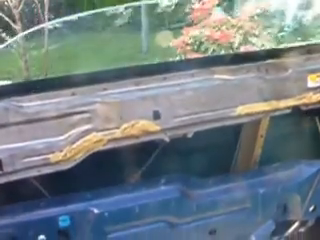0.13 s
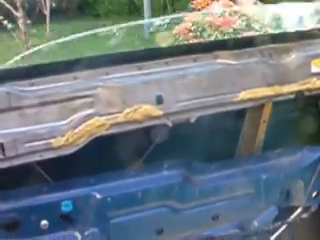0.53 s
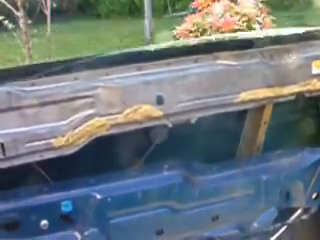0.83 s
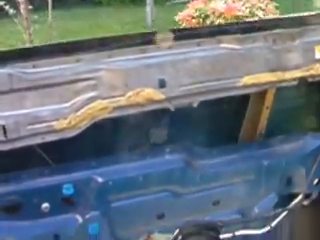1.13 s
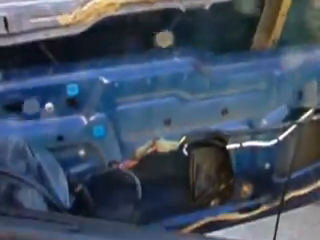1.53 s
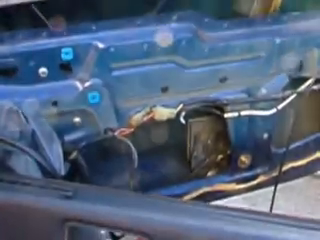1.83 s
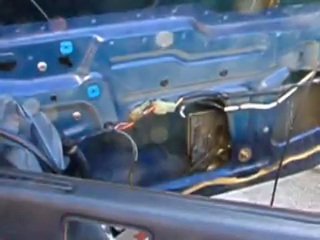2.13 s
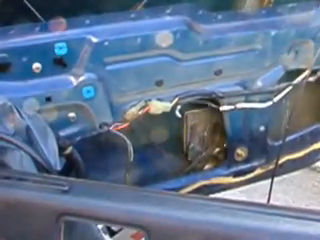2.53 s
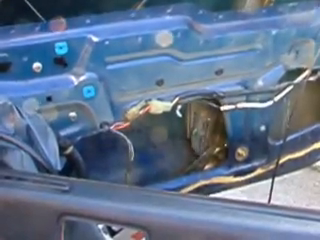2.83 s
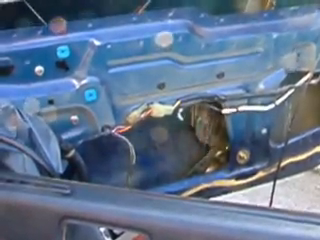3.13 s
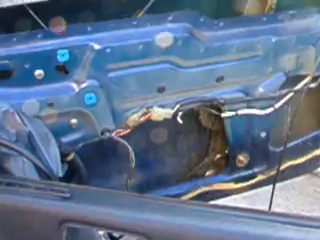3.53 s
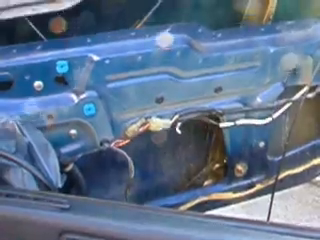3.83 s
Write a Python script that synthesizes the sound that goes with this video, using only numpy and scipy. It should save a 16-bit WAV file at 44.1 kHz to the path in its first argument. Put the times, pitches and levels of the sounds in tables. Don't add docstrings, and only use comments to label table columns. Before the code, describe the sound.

A small electric window motor whirs, stops with steel clunks, then clacks and whirs again lower.

```python
import sys
import numpy as np
from scipy import signal
from scipy.io import wavfile

SR = 44100
rng = np.random.default_rng(int(sys.argv[2]) if len(sys.argv) > 2 else 0)


def unload_wav(signal):
    wavfile.write(
        sys.argv[1],
        SR,
        np.round(np.clip(np.atleast_2d(signal).T, -1, 1) * 32767).astype(np.int16),
    )


def linear_from_db(decibels):
    return 10 ** (np.asarray(decibels, float) / 20)


N = 176400
T_S = np.arange(N) / SR
CONTACT_RISE_S = 0.003


def rms_one(x):
    return x / np.sqrt(np.mean(x ** 2) + 1e-20)


def peak_one(x):
    return x / np.abs(x).max()


def low_pass(x, order, hz):
    return signal.sosfilt(signal.butter(order, hz, fs=SR, output="sos"), x)


def band_pass(x, low_hz, high_hz):
    return signal.sosfilt(signal.butter(2, [low_hz, high_hz], "band", fs=SR, output="sos"), x)


def add(out, start_s, x):
    i = int(start_s * SR)
    out[i:i + len(x)] += x[:N - i]


def tracks(table):
    time_s, *columns = np.transpose(table)
    return [np.interp(T_S, time_s, column) for column in columns]


def drift(rate_hz):
    r = np.exp(-80 * np.pi * rate_hz / SR)
    white = rng.standard_normal(N // 40 + 2002)
    slow = signal.lfilter([1], [1, -2 * r, r * r], white)[2000:]
    return np.interp(np.arange(N) / 40, np.arange(len(slow)), rms_one(slow))


def banded(spectrum, patchy_db):
    spectrum_hz, spectrum_db = np.transpose(spectrum)
    edges_hz = 22 * 2 ** np.arange(0, 9.1, .5)
    together = drift(6.0)
    white = rng.standard_normal((2, N))
    out = 0
    for k, (low_hz, high_hz) in enumerate(zip(edges_hz, edges_hz[1:])):
        band_db = np.interp(np.log(low_hz * high_hz) / 2, np.log(spectrum_hz), spectrum_db)
        flicker_db = patchy_db * (.6 * together + drift(15.0))
        out = out + band_pass(white[k % 2], low_hz, high_hz) * linear_from_db(band_db + flicker_db)
    return rms_one(out)


def resonance(x, hz, width_hz):
    r = np.exp(-np.pi * width_hz / SR)
    poles = [1, -2 * r * np.cos(2 * np.pi * hz / SR), r * r]
    return signal.lfilter([(1 - r * r) / 2, 0, (r * r - 1) / 2], poles, x)


def judder(modes, rise_s, hold_s):
    t = np.arange(SR // 4) / SR
    out = 0
    for hz, db, t60_s in modes:
        uneven, detune, phase = rng.standard_normal(3)
        fall = linear_from_db(db + 2 * uneven - 60 * np.maximum(t - hold_s, 0) / t60_s)
        out = out + fall * np.sin(2 * np.pi * (hz * (1 + 0.028 * detune) * t + phase))
    return peak_one(out * np.sin(np.pi / 2 * np.clip(t / rise_s, 0, 1)) ** 2)


def struck(modes, contact_s, spread_db, dull_hz):
    t = np.arange(SR // 5) / SR
    envelope = np.clip(t / CONTACT_RISE_S, 0, 1) * np.clip(2 - t / contact_s, 0, 1) ** 2
    push = rng.standard_normal(len(t)) * envelope + 1e-18
    push[int(CONTACT_RISE_S * SR / 2)] += 8.9 * np.sqrt(contact_s / 0.0071)
    push = low_pass(push, 4, 1.46 * dull_hz)
    out = 0
    for hz, db, t60_s in modes:
        ring = peak_one(resonance(push, hz, np.log(1000) / np.pi / t60_s))
        strength = linear_from_db(db + spread_db * rng.standard_normal())
        out = out + ring * strength / (1 + (hz / dull_hz) ** 2)
    return peak_one(out)


def noise_crack(contact_s, dull_hz):
    t60_1khz_s, slope = 0.12, 0.65
    t = np.arange(SR // 5) / SR
    edges_hz = 250 * 2.0 ** np.arange(0, 5.6, .5)
    white = rng.standard_normal(len(t)) * np.clip(t / CONTACT_RISE_S, 0, 1)
    crack = 0
    for low_hz, high_hz in zip(edges_hz, edges_hz[1:]):
        t60_s = t60_1khz_s * (1000 / low_hz) ** slope
        fall = linear_from_db(-60 * np.maximum(t - contact_s / 2, 0) / t60_s)
        crack = crack + band_pass(white * fall, low_hz, high_hz)
    return peak_one(low_pass(crack, 3, dull_hz))


def clunks(hits, modes):
    out = np.zeros(N)
    for time_s, ring_db, crack_db, contact_s, dull_hz in hits:
        add(out, time_s, linear_from_db(ring_db) * struck(modes, contact_s / 2, 2, dull_hz))
        add(out, time_s, linear_from_db(crack_db) * noise_crack(contact_s, dull_hz))
    return out


def air():
    # (frequency [Hz], density [dB per Hz])
    room = [(20, -35), (30, -5.5), (65, -1), (420, -14), (1150, -15), (6900, -18), (9500, -23.5)]
    whistle_hz, whistle_db = 6720, -67.5
    whistle = linear_from_db(whistle_db + 1.5 * drift(5.8)) * np.sin(2 * np.pi * whistle_hz * T_S)
    return linear_from_db(-51.5) * banded(room, patchy_db=2.1) + whistle


def jolts():
    # (time [s], level [dB], frequency [Hz], t60 [s])
    sways = [
        (1.04, -42, 55, .15),
        (1.09, -41, 36, .3),
        (1.43, -46.5, 33, .3),
        (2.235, -46, 50, .1),
        (2.55, -43, 60, .15),
        (2.7, -47, 40, .25),
    ]
    out = np.zeros(N)
    for time_s, db, hz, t60_s in sways:
        add(out, time_s, linear_from_db(db) * judder([(hz, 0, t60_s)], .015, 0.013))
    return out


def thuds():
    # (time [s], knock level [dB], rumble level [dB], contact [s])
    knocks = [(.761, -30.5, -34, 0.016), (1.029, -28, -32.5, 0.038), (1.06, -28.5, -38.5, 0.024),
              (1.134, -31, -37.5, 0.022), (1.211, -26.5, -42, 0.02), (1.25, -35, -38, 0.0043),
              (1.297, -25, -37.5, 0.014), (1.613, -31.5, -43, 0.015), (2.236, -54, -50.5, 0.0079),
              (2.433, -39, -38.5, 0.025), (2.491, -26.5, -47, 0.022), (2.522, -32.5, -34.5, 0.031),
              (2.561, -25.5, -32.5, 0.023), (2.656, -30, -33.5, 0.013), (3.092, -22, -31.5, 0.019),
              (3.128, -32, -40, 0.011), (3.339, -24, -28, 0.023), (3.676, -23, -27.5, 0.027),
              (3.855, -27.5, -32, 0.011), (3.878, -34.5, -41, 0.052)]
    # (frequency [Hz], level [dB], t60 [s])
    knock_modes = [(321.3, -5.5, 0.059), (380, -0.5, 0.1), (415.3, 0, 0.069), (469, -9, 0.039)]
    # (frequency [Hz], level [dB], t60 [s])
    rumble_modes = [(116.8, 4, 0.2), (135, 2, 0.058), (183.5, 1, 0.025), (217.9, 3, 0.17),
                    (262.4, 2.5, 0.087)]
    knock_rise_s, rumble_rise_s = 0.0031, 0.0081
    rumble_lag_s, rumble_hold_s = 0.0033, 0.058
    out = np.zeros(N)
    for time_s, knock_db, rumble_db, contact_s in knocks:
        knock = judder(knock_modes, knock_rise_s, contact_s)
        rumble = judder(rumble_modes, rumble_rise_s, rumble_hold_s)
        add(out, time_s - knock_rise_s / 2, linear_from_db(knock_db) * knock)
        add(out, time_s + rumble_lag_s, linear_from_db(rumble_db) * rumble)
    return out


def switch_release():
    # (time [s], ring level [dB], crack level [dB], contact [s], dullness [Hz])
    hits = [
        (1.604, -33, -35, 0.0073, 8000),
        (1.611, -31, -33, 0.0144, 7900),
    ]
    # (frequency [Hz], level [dB], t60 [s])
    modes = [(559, 2, 0.13), (1074, -1, 0.056), (1880, 0, .05), (2650, -5, .04), (4110, -2, 0.045),
             (4540, -3, 0.041), (4870, -24, .03), (5850, -15, .02), (7300, -12, .02)]
    return clunks(hits, modes)


def switch_press():
    # (time [s], ring level [dB], crack level [dB], contact [s], dullness [Hz])
    hits = [
        (2.401, -48, -36, 0.011, 8900),
        (2.414, -27, -24.5, 0.0057, 9000),
    ]
    # (frequency [Hz], level [dB], t60 [s])
    modes = [(1120, -7, 0.093), (1970, -2.5, 0.12), (2650, -8, 0.046), (3950, -12, .03), (4760, -5, .03),
             (5630, 0, .03), (7800, 6, .03)]
    return clunks(hits, modes)


def stop_clunks():
    # (time [s], ring level [dB], crack level [dB], contact [s], dullness [Hz])
    hits = [
        (1.055, -17, -28.5, 0.037, 4200),
        (1.145, -36, -38, 0.015, 1000),
        (1.098, -36, -34.5, 0.006, 3000),
    ]
    # (frequency [Hz], level [dB], t60 [s])
    modes = [(759, 3.5, 0.15), (854, -12, 0.04), (1050, -8.5, 0.2), (1197, -7, 0.049), (1544, -6, 0.11),
             (1954, 1, 0.15), (2330, -5.5, 0.057), (2624, 1.5, 0.07), (2890, -0.5, 0.042),
             (3290, -11, 0.063), (4500, -15, 0.06)]
    return clunks(hits, modes)


def carrier_slam():
    # (time [s], ring level [dB], crack level [dB], contact [s], dullness [Hz])
    hits = [
        (1.208, -25, -25.5, 0.0071, 1480),
        (1.243, -28, -36, 0.013, 1290),
        (1.295, -14.5, -18, 0.014, 4500),
        (1.322, -26, -29.5, 0.0083, 2500),
    ]
    # (frequency [Hz], level [dB], t60 [s])
    modes = [(555, -4, 0.095), (744, 3.5, 0.08), (817, 0.5, 0.037), (1096, 0, 0.056), (1465, 2, .06),
             (1900, -3, 0.065), (2400, -27, 0.046), (2600, -21, .05), (2805, -7, 0.07), (3800, -18, .04),
             (4440, -7, 0.026), (5040, -13, 0.028), (6090, -11, .025), (6700, -11, .025)]
    return clunks(hits, modes)


def gear_latch():
    # (time [s], ring level [dB], crack level [dB], contact [s], dullness [Hz])
    hits = [
        (2.494, -30, -26, 0.0035, 3380),
        (2.512, -32.5, -40, 0.0056, 3420),
        (2.530, -16.5, -19, 0.0089, 7000),
        (2.552, -18.5, -24.5, 0.011, 6100),
        (2.566, -19, -20, 0.0096, 3380),
        (2.578, -23, -25.5, 0.005, 3000),
        (2.592, -27, -35, 0.0034, 2930),
        (2.606, -29, -34, 0.0047, 2980),
    ]
    # (frequency [Hz], level [dB], t60 [s])
    modes = [(802, -4.5, 0.052), (1560, -11, 0.072), (1900, -12, 0.06), (1977, -6.5, 0.087),
             (2835, -2.5, 0.058), (2950, -1.5, 0.068), (3030, -5, 0.056), (3350, -11.5, .05),
             (4100, -17, 0.04), (6030, -21, 0.027)]
    return clunks(hits, modes)


def squeal():
    # (time [s], frequency [Hz], level [dB], loss per overtone [dB])
    chirp = [
        (2.457, 941, -60, 5),
        (2.462, 993, -29, 2),
        (2.467, 1027, -28, 3.5),
        (2.476, 1038, -36.5, 7),
        (2.485, 963, -30.5, 10),
        (2.493, 1041, -34, 8),
        (2.504, 977, -40, 3.5),
        (2.521, 973, -40, 3),
        (2.53, 943, -70, 0),
    ]
    # (multiple [1], level [dB])
    partials = [(.82, -7), (1, 0), (2, -2), (3, 1), (4, -5)]
    rough = .5
    hz, db, loss_db = tracks(chirp)
    turn = 2 * np.pi * np.cumsum(hz * (1 + rough / 20 * drift(120.0))) / SR
    out = 0
    for order, order_db in partials:
        strength = linear_from_db(order_db - loss_db * (order - 1)) * (1 + rough * drift(100.0))
        out = out + strength * np.sin(order * turn)
    return linear_from_db(db) * out


def stall():
    # (frequency [Hz], width [Hz], level [dB])
    strain = [
        (300, 145, -39),
        (740, 92, -53),
        (5200, 260, -59.5),
        (6810, 230, -57.5),
    ]
    start_s, end_s = 1.08, 1.29
    gate = np.clip(np.minimum(T_S - start_s, end_s - T_S) / 0.016, 0, 1)
    out = 0
    for hz, width_hz, db in strain:
        narrow = resonance(rng.standard_normal(N), hz, width_hz)
        buzz = rms_one(resonance(narrow, hz, 2 * width_hz))
        out = out + linear_from_db(db + 2.2 * drift(52.0)) * buzz
    return gate * out


def gear_noise(hiss, resonances, spark_swing_db):
    body = banded(hiss, patchy_db=-0.6)
    samples = np.arange(N)
    for hz, width_hz, db in resonances:
        lively_db = 2.2 * drift(5.9) + 0.26 * (hz > 2000) * spark_swing_db
        wander = samples + .006 * SR / 60 * drift(4.0)
        ring = rms_one(resonance(rng.standard_normal(N), hz, width_hz))
        body = body + linear_from_db(db + lively_db) * np.interp(wander, samples, ring)
    white = rng.standard_normal(N)
    for hz in np.geomspace(1200, 7500, 20) * rng.uniform(.97, 1.03, 20):
        rattle_db = -20 + 0.62 * spark_swing_db + 3.5 * drift(7.3)
        body = body + linear_from_db(rattle_db) * rms_one(resonance(white, hz, 30))
    return body


def commutator_whine(hz):
    # (multiple [1], level [dB])
    partials = [(.5, 0), (1, 3.5), (2, -8)]
    wobble, flutter_db = .0009, 1.0
    turn = 2 * np.pi * np.cumsum(hz * (1 + wobble * drift(26.0))) / SR
    return sum(linear_from_db(db + flutter_db * drift(6.2)) * np.sin(order * turn) for order, db in partials)


def motor(effort, hiss, resonances):
    gear_db, whine_hz, whine_db, spark_db = tracks(effort)
    gear = gear_noise(hiss, resonances, spark_db - spark_db.max())
    sizzle = signal.butter(4, 5050, "high", fs=SR, output="sos")
    sparks = signal.sosfilt(sizzle, rng.standard_normal(N))
    whine = np.sqrt(2) * commutator_whine(whine_hz)
    return linear_from_db(gear_db) * gear + linear_from_db(spark_db + 1.5 * drift(30.0)) * sparks + linear_from_db(whine_db) * whine


def motor_down():
    # (time [s], gear noise [dB], whine [Hz], whine level [dB], brush sparking [dB])
    effort = [
        (0, -42, 1495, -54, -57),
        (.38, -42.5, 1508, -70, -64.5),
        (.48, -41, 1523, -54.5, -44.5),
        (.8, -41.5, 1523, -57.5, -37.5),
        (1.0, -39.5, 1530, -53.5, -48),
        (1.05, -41, 1522, -54, -60),
        (1.12, -56, 1540, -70, -59),
        (1.28, -65.5, 1440, -69, -66),
        (1.34, -79, 1400, -84.5, -82),
    ]
    # (frequency [Hz], density [dB per Hz])
    hiss = [(25, -43), (45, -5), (350, 1), (630, -6.5), (1660, -6), (3100, -6.5), (6700, -14.5),
            (9500, -18)]
    # (frequency [Hz], width [Hz], level [dB])
    resonances = [(351, 33, -8.5), (750.5, 21, -9.5), (820, 110, -6.5), (1400, 15, -13), (2250, 41, -11.5),
                  (2500, 55, -10.5), (2720, 64, -15), (3036, 37, -11.5), (3870, 26, -19), (4190, 38, -22.5),
                  (5130, 60, -26), (5480, 38, -21.5), (5920, 88, -18), (6350, 65, -15), (6750, 45, -15.5),
                  (6810, 45, -15)]
    return motor(effort, hiss, resonances)


def motor_up():
    # (time [s], gear noise [dB], whine [Hz], whine level [dB], brush sparking [dB])
    effort = [(2.4, -54, 1000, -78, -83), (2.46, -44.5, 1050, -69, -73), (2.62, -43.5, 1140, -68, -46),
              (2.69, -41, 1125, -52, -44), (2.78, -42.5, 1076, -50, -41.5), (3.12, -43, 1048, -52.5, -43),
              (3.15, -41, 1051, -55, -50.5), (3.5, -41.5, 1061, -59.5, -56.5),
              (3.64, -40.5, 1058, -58, -62), (3.8, -42, 1070, -57, -55), (3.84, -42.5, 1080, -51, -60),
              (4, -43, 1102, -52, -59)]
    # (frequency [Hz], density [dB per Hz])
    hiss = [(25, -38.5), (45, -2), (400, 3), (640, 3.5), (1300, 0.5), (4500, -6.5), (7200, -9),
            (9500, -14.5)]
    # (frequency [Hz], width [Hz], level [dB])
    resonances = [(121, 51, -12), (349, 43, -8), (811, 60, -8.5), (1568, 30, -18.5), (2143, 95, -16),
                  (2470, 30, -19.5), (2700, 33, -19), (3035, 50, -9), (3450, 44, -15), (3810, 24, -15.5),
                  (4210, 50, -22.5), (4950, 50, -19), (5160, 87, -14.5), (6160, 44, -16.5),
                  (6970, 45, -17.5), (7680, 41, -24)]
    return motor(effort, hiss, resonances)


def scene():
    door = jolts() + thuds() + switch_release() + switch_press()
    mechanism = stop_clunks() + carrier_slam() + gear_latch() + squeal()
    drive = stall() + motor_down() + motor_up()
    return (air() + door + mechanism + drive)[None]


def roll_off(x):
    return signal.sosfilt(signal.butter(12, 9210, fs=SR, output="sos"), x)


def record(dry):
    soft = low_pass(dry, 12, 7623)
    steep = signal.cheby2(16, 40, 9300, fs=SR, output="sos")
    mix = signal.sosfilt(steep, soft)
    return roll_off(mix)


dry = scene()
out = record(dry)
unload_wav(out)
```